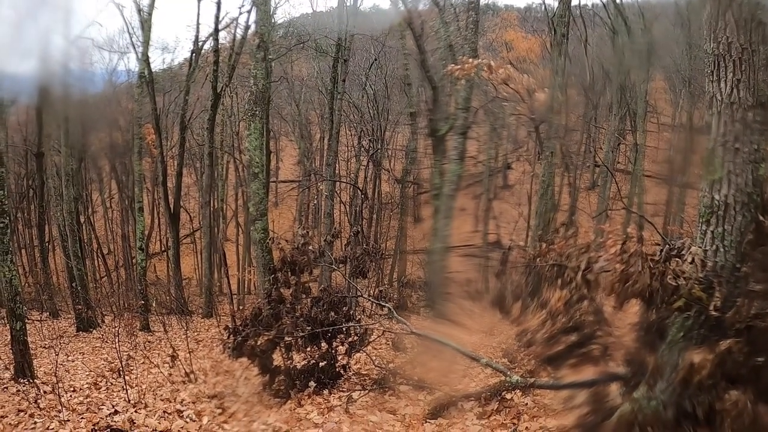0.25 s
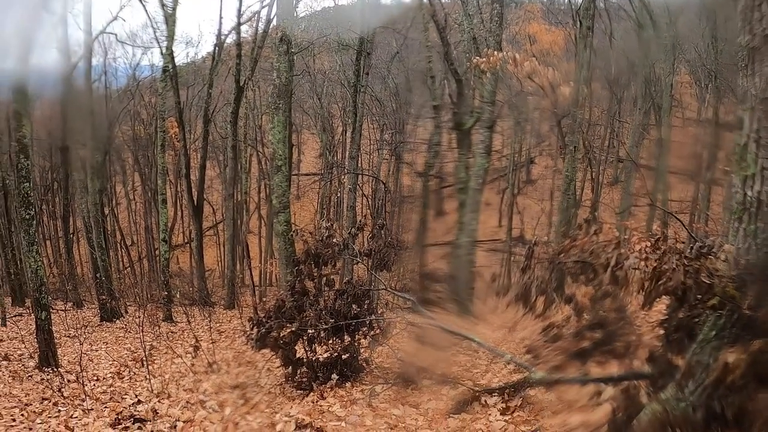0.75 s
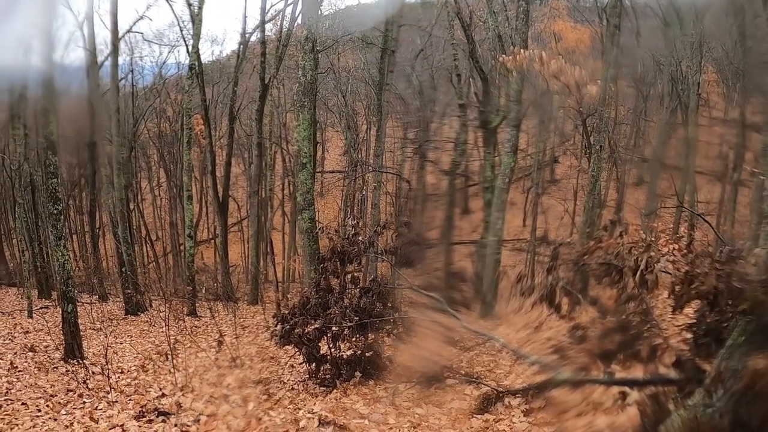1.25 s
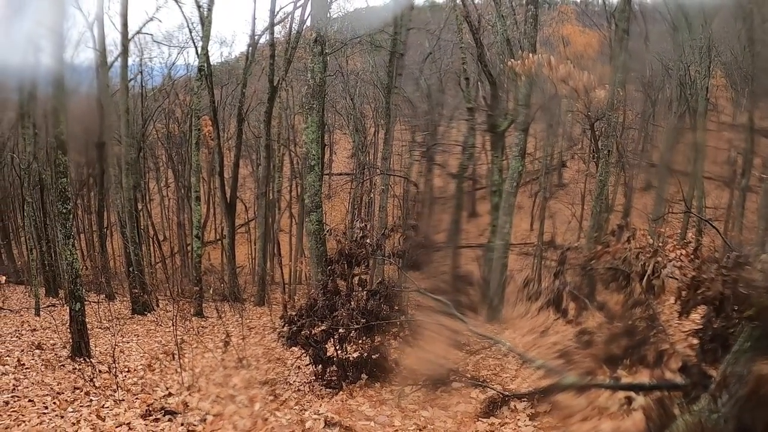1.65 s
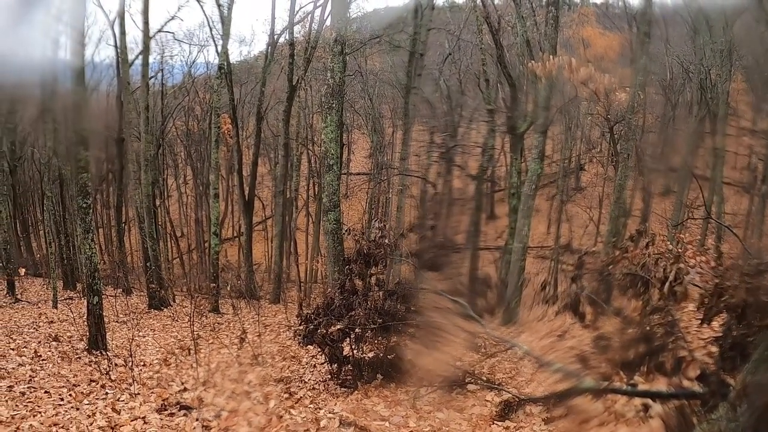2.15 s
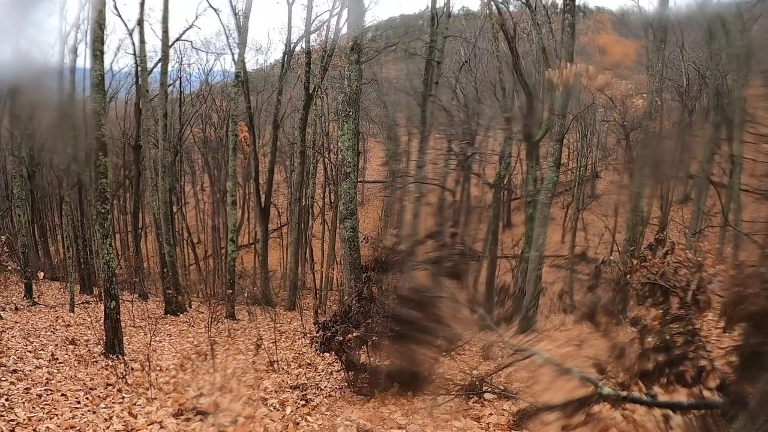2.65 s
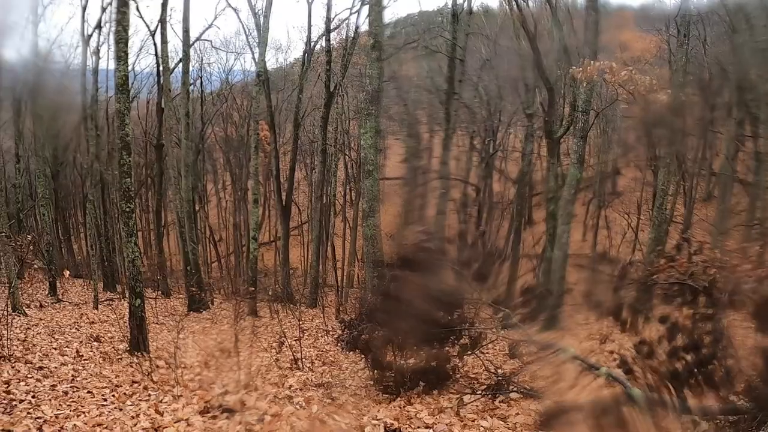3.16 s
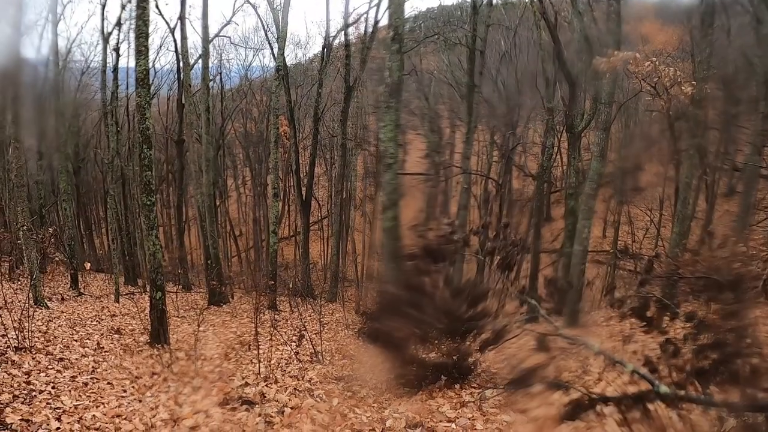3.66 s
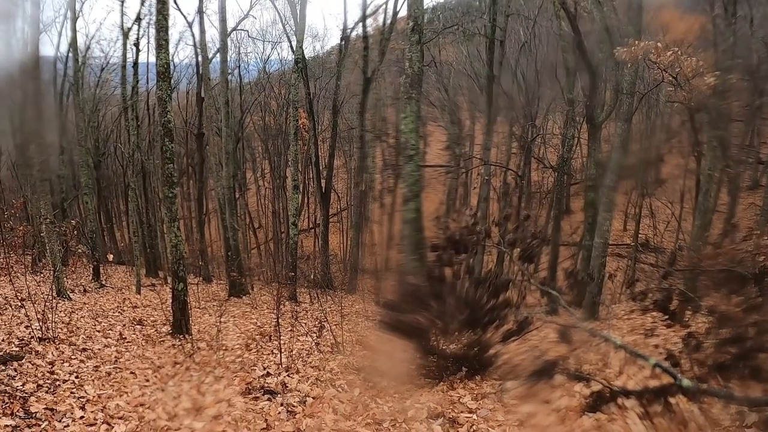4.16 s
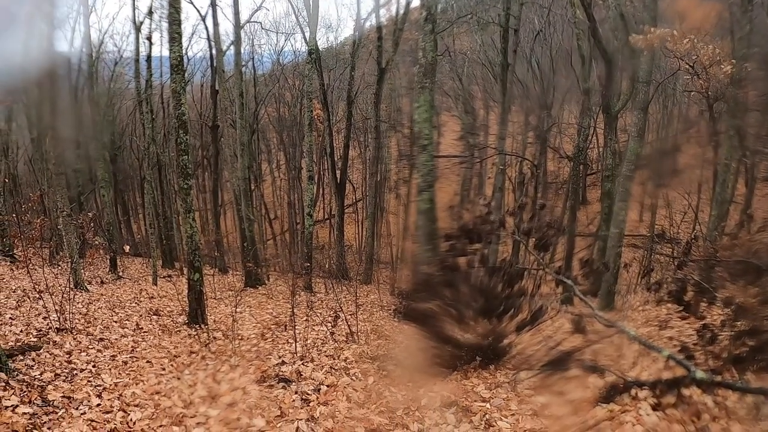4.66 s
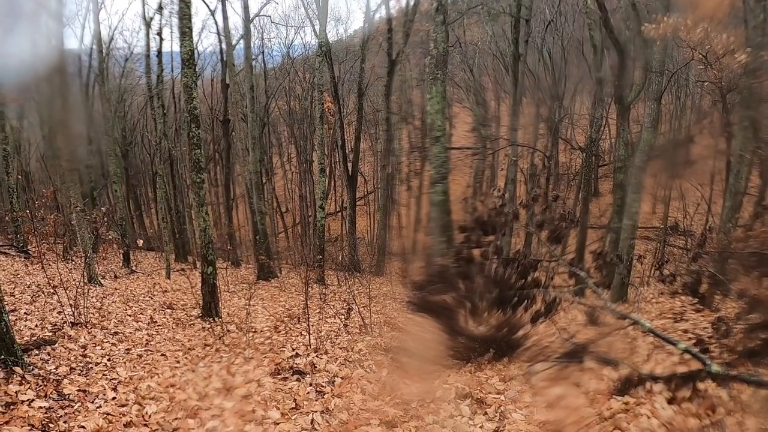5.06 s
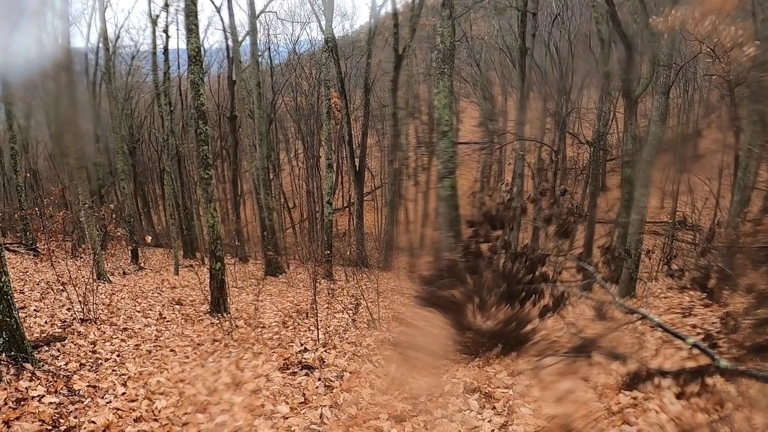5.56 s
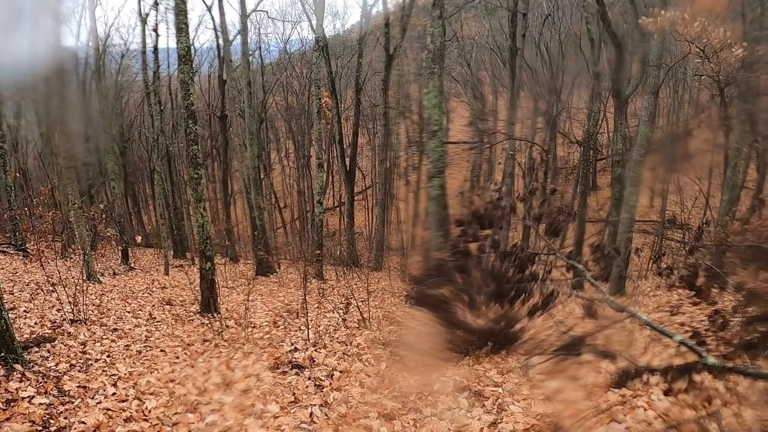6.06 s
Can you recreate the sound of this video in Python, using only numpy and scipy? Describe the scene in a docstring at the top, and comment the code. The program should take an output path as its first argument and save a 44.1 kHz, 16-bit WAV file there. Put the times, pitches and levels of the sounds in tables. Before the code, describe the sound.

Far hounds in a bare, wet wood. A small squeal leads into a long wavering bay, then a pause with leaf ticks and low wind bumps. Squeals break into a second hoarse bay, a thin whine follows, then a third bay with a lower second voice and a final shrill yelp. Each call rings long between the trunks. The stereo microphone stands among dry leaves, with light breeze.

```python
"""Hounds bay far off in a bare, wet wood: three long bays among squeals, whines and yelps, ringing on
between the trunks. Close by, drops tick on dead leaves, some ticks are bright, twigs hiss and gusts thump
on the microphone ports; a drone, a rough yap and a thin whistle are faint. Voices are fluttering partials
plus a throaty rasp, the wood is a noise tail, the near sounds are shaped noise and short bursts."""
import sys
import numpy as np
from scipy import signal
from scipy.fft import rfft, irfft, next_fast_len
from scipy.io import wavfile

SR = 44100
rng = np.random.default_rng(int(sys.argv[2]) if len(sys.argv) > 2 else 0)


def wav_record(signal):
    """Record a signal, one row per channel, as 16-bit PCM in the file named by sys.argv[1]."""
    frames = np.transpose(np.atleast_2d(signal))
    bounded = np.clip(frames, -1, 1)
    # unit amplitude maps onto the largest positive 16-bit level
    quanta = np.round(bounded * 32767).astype(np.int16)
    wavfile.write(sys.argv[1], SR, quanta)


N = 278271

# Far drone spectrum. Each row: frequency in Hz, relative density in dB per Hz.
DRONE_SPECTRUM = [(53, -33), (90, -17), (118, -3), (254, 5), (340, -6.5), (532, -2.5), (674, -8),
                  (715, -24), (873, -29), (1500, -27.5), (1950, -35.5), (3300, -120)]
# Far drone level. Each row: time in seconds, level in dB.
DRONE_LEVEL = [(0, -58), (2.0, -56), (3.2, -54.5), (4.2, -58), (5.5, -59), (6.31, -61)]
# Wind on the ports between gusts. Each row: time in seconds, level in dB.
WIND_LEVEL = [(0, -67), (.8, -65.5), (1.1, -64.5), (1.65, -68.5), (1.85, -49), (2.2, -59), (2.62, -65),
              (2.9, -57), (3.1, -59.5), (3.4, -56.5), (3.6, -71), (4.3, -65.5), (5.2, -70), (6.31, -68)]
# Gust peaks on the ports. Each row: time in seconds, level in dB.
GUST_PEAKS = [(.5, -53), (1.05, -54), (1.79, -49), (2.059, -37.5), (2.354, -40.5), (2.809, -45),
              (3.44, -51), (4.48, -54), (5.661, -59)]
GUST_RISE_DB_PER_S, GUST_FALL_DB_PER_S, WIND_SWING_DB = 402, 263.5, 2
# Twig hiss spectrum. Each row: frequency in Hz, relative density in dB per Hz.
HISS_SPECTRUM = [(700, -21.5), (1000, 3), (1600, 1.5), (2500, -3.5), (4000, -6.5), (6300, -14.5),
                 (8000, -11), (11000, -29.5), (15000, -21)]
# Twig hiss in the breeze. Each row: time in seconds, level in dB.
HISS_LEVEL = [(0, -56.5), (.8, -60), (1.1, -56), (1.25, -52), (1.42, -59), (2.6, -59.5), (3.45, -58),
              (3.74, -53), (4.0, -58), (4.6, -59), (4.79, -54.5), (5.0, -60.5), (5.3, -60.5), (6.05, -61),
              (6.19, -57.5), (6.31, -63)]
# Left-right correlation of the noise beds. Each row: frequency in Hz, correlation (0 to 1).
LIKENESS = [(60, .2), (110, 0.092), (210, 0.8), (390, 0.92), (740, 0.39), (1390, 0.7), (2600, 0.45),
            (5000, 0.43), (10000, 0.13)]
RUSTLE_FROM_DB = -54.5  # hiss level at which the top doubles
PATTER_PER_S, PATTER_DB = 45, -5  # median rate of small drops; level above the twig hiss
# Bright treble of the ticks, some of it on the drops. Each row: time in seconds, peak in dB,
# left above right in dB.
BRIGHT_TICKS = [(0.24, -40, -2), (.872, -40, -2), (.935, -44, 0), (1.08, -35.5, -2), (1.7581, -44.5, 2.5),
                (2.2674, -45.5, -2.5), (2.454, -48, -1.5), (3.4861, -44, 1), (3.55, -39.5, -4),
                (3.609, -38, 0), (3.7835, -48.5, 0), (4.046, -45, 1), (4.181, -43, -.5),
                (4.5392, -47.5, -6), (4.7952, -45, -10), (4.8765, -50, -2), (5.777, -45, 2),
                (5.957, -44.5, 1)]
# Drops on leaves. Each row: time in seconds, peak without crack in dB, pitch in Hz,
# left above right in dB.
LEAF_DROPS = [(0.132, -42, 2850, -6), (0.463, -42, 2660, 5), (0.5865, -43.5, 3770, 2),
              (0.884, -41.5, 2760, -7), (1.078, -40, 3142, -4), (1.1174, -41, 3550, -3),
              (1.47, -50, 7500, -8), (1.529, -46, 3070, 3), (1.631, -43, 1390, 0), (1.809, -44, 1300, 0),
              (2.018, -41, 1150, 4), (1.757, -46, 7000, 0), (1.7774, -40.5, 3377, 0),
              (1.928, -41, 3470, -3), (1.962, -33.5, 2650, 3), (2.346, -38.5, 5300, -1),
              (2.6145, -40, 3000, 0), (2.66, -43.5, 2670, -9), (3.485, -44, 2600, -2),
              (3.521, -39.5, 2890, -5), (3.549, -41, 2750, -2), (3.609, -50, 3540, -3),
              (3.714, -40, 3950, 11), (3.749, -40, 2550, 10), (4.047, -33, 2559, 1.5),
              (4.059, -33.5, 2600, 1.5), (4.18, -43, 2960, 0), (4.2057, -40.5, 3150, 1),
              (4.3355, -43, 2740, 1), (4.41, -36, 2400, 4), (4.4878, -39.5, 2550, 8),
              (4.724, -36.5, 2750, 4), (4.8278, -43, 3085, 14), (4.877, -42, 4660, 2.5),
              (4.971, -47, 3075, -16), (5.388, -40, 4100, -2), (5.881, -46.5, 2550, 0),
              (5.977, -42, 4300, 0), (6.242, -42.5, 4100, -2)]
BRIGHT_TICK_T60_S, DROP_T60_S, DROP_RISE_S = .02, .021, .0013
CRACK_DB, CRACK_SPREAD_DB = -16.5, 5  # above the drop's tick; spread from drop to drop
# Faint thin whistle, perhaps a bird. Each row: time in seconds, pitch in Hz, level in dB.
WHISTLE = [(3.14, 5200, -80), (3.17, 5180, -76), (3.3, 5150, -77), (3.36, 5130, -84)]
# Faint rough yap. Each row: time in seconds, level in dB.
FAR_YAP_LEVEL = [(2.77, -73), (2.8, -59), (2.9, -59.5), (2.94, -64)]
# Its throat. Each row: resonance in Hz, width in Hz, gain in dB.
FAR_YAP_THROAT = [(1666, 240, 1), (2120, 180, -9), (2320, 340, -12)]
FAR_YAP_HZ, FAR_YAP_PAN_DB = 343, 29  # pitch; left above right
FAR_YAP_BREATH = .7  # noise share of source power
# Ringing between the trunks. Each row: frequency in Hz, 60 dB decay in seconds.
WOOD_DECAY = [(500, 2.215), (1100, 2.07), (1800, 2.46), (2900, 0.95), (3500, 0.74)]
WOOD_DB, WOOD_RISE_S = -3.5, .023
WOOD_SIDE_DB, WOOD_SIDE_DB_PER_OCTAVE = -11.5, 5  # side against mid; wider in the treble
NEAR_TREES_DB, NEAR_TREES_S = 9, .1  # the nearest trunks answer louder, and only briefly
# Three long bays, an undertone, a squeal, a whine and a second low voice, one list each. Each row:
# time in seconds, pitch in Hz, level in dB, overtones above level in dB, hoarseness above level in dB.
BAYS = [
    [(.415, 604, -48.5, -23, -4.5), (.45, 557, -27.5, -16.5, -9.5), (.5, 553.7, -28.5, -21, -4.5),
     (.545, 545.7, -30.5, -35.5, -6), (.6, 516.3, -35, -29, -6), (.66, 513.6, -28.5, -26.5, -17),
     (.7, 497.7, -40.5, -11, -27), (.765, 517.8, -27, -23.5, -24.5), (.815, 525, -42.5, -3.5, -29),
     (.865, 531.7, -28.5, -15.5, -29), (.94, 538.2, -48, 2.5, -10.5), (1.0, 547, -31.5, -21, -33),
     (1.035, 548, -33, -18.5, -42), (1.06, 548, -36, -38, -32), (1.12, 549, -43, -33, -37),
     (1.155, 549, -64, -10, -30), (1.21, 549, -51.5, -13, -33)],
    [(3.64, 566.6, -53.5, -10.5, 0), (3.705, 549, -32, -28.5, -6.5), (3.745, 553.7, -29.5, -19, -9.5),
     (3.79, 513, -35.5, -15.5, -3), (3.84, 504, -28, -19.5, -10.5), (3.9, 511.7, -35.5, -5.5, -11.5),
     (3.96, 521, -38, -12, -11.5), (4.02, 544.6, -33, -6.5, -29), (4.06, 585, -26, -23.5, -32),
     (4.11, 594.4, -23, -10.5, -48), (4.14, 570, -28, -15, -16), (4.18, 531.1, -31.5, -17.5, -24),
     (4.25, 553.8, -41, -14, -17.5), (4.33, 532.6, -38.5, -29, -20)],
    [(5.245, 726, -57.5, -14.5, 0.5), (5.27, 646, -23, -26, -16), (5.31, 576.4, -25, -29.5, -12.5),
     (5.4, 524.7, -29.5, -32, -8.5), (5.45, 496, -34, -10.5, -6.5), (5.5, 514.8, -35.5, -12.5, -2.5),
     (5.58, 527, -29, -32, -12), (5.68, 548.7, -30, -26, -12.5), (5.78, 568, -28, -26, -14),
     (5.88, 585, -36.5, -25, -10.5), (5.93, 557, -51, -2, -6.5)],
    [(.49, 468.5, -54, 2, -23), (.52, 451, -46.5, 17.5, -9.5), (.55, 431.3, -55, 12.5, -13.5),
     (.6, 463, -45.5, 5.5, -23), (.67, 493, -45, -0.5, -9), (.7, 499, -47, 4, -4)],
    [(.35, 1244, -56, 3, -8.5), (.372, 1040, -35, -13, -24), (.388, 937, -42.5, 2, -15),
     (.405, 850, -43.5, 1.5, -6.5), (.415, 900, -43, -5.5, 0.5), (.43, 890, -38, 0, -8),
     (.455, 883, -40, -10.5, -4)],
    [(4.63, 1038, -49, -6.5, -28), (4.655, 1106, -40, -19, -21), (4.685, 1125, -36, -19, -23),
     (4.71, 1075, -44.5, -19, -21), (4.76, 1135, -48, -10, -24), (4.83, 1087, -50, -13, -8)],
    [(5.63, 488.5, -29, -22, -19.5), (5.7, 483.6, -37, -24, -17.5), (5.78, 484.6, -31.5, -32, -18.5),
     (5.84, 443.6, -37, -24, -31), (5.97, 504.7, -44.5, -9, 0.5)],
]
# Squeals, whines, yelps, and side tones between the partials of the bays. Each row: start, rise and
# fall in seconds, first and last pitch in Hz, glide time in seconds, level in dB, overtones and
# hoarseness above level in dB.
SHORT_CRIES = [(.275, 0.016, 0.066, 620, 648, 0.026, -51, -31, -27.5),
               (3.362, 0.014, 0.049, 1881, 1800, 0.039, -36.5, -55, -20.5),
               (3.392, 0.0061, 0.016, 1800, 904, 0.033, -45, -39, -15),
               (3.41, 0.0065, 0.057, 1098, 870, 0.018, -42, -30, -0.5),
               (3.419, 0.017, .07, 722, 644, .03, -43.5, -28, -8),
               (3.533, 0.058, 0.0033, 1071, 1051, 0.052, -31, -22.5, -33.5),
               (3.596, 0.011, 0.068, 1260, 878, .018, -27, -17, -19),
               (3.649, 0.049, 0.053, 1040, 831, 0.03, -27.5, -25, -12.5),
               (4.119, 0.016, 0.095, 890, 787, .05, -43, -8, -19),
               (5.208, 0.041, 0.075, 1187, 878, 0.015, -40, -7.5, -2.5),
               (5.761, 0.082, 0.11, 690, 779, 0.057, -36.5, -25, -41),
               (5.9, 0.026, 0.2, 770, 779, 0.053, -50.5, -6, -19),
               (0.554, 0.01, 0.021, 620, 699, 0.019, -28, -24, -14)]
# A last, shriller yelp. Columns as in the bays.
SHRILL_YELP = [(6.04, 920, -56, 0, -7), (6.058, 1127, -42, -2, -7.5), (6.078, 1461, -35.5, -3, -5),
               (6.092, 1509, -37.5, 3, -1.5), (6.115, 1492, -43, 1.5, -0.5), (6.135, 1474, -55, -14, 9),
               (6.2, 1470, -55.5, -16, 11), (6.3, 1484, -55, -16, 0)]
# Throats of the hoarse part. Each row: resonance in Hz, width in Hz, gain in dB.
THROAT = [(442.7, 85, -2.5), (585, 153, 7.5), (826, 310, 0.5), (1350, 455, -8.5), (1756, 240, -12),
          (2225, 410, -24)]
SHRILL_THROAT = [(1150, 540, 1), (1800, 230, -11), (2210, 440, -11), (2780, 660, -21), (3550, 500, -22)]
# Colour of the overtones. Each row: frequency in Hz, gain in dB.
MOUTH_COLOUR = [(900, -18.5), (1050, 4.5), (1200, 0.5), (1400, 1), (1550, 6.5), (1750, 7.5), (1950, -5),
                (2300, 3), (2650, -24.5), (3000, -16), (5000, -47.5)]
# Mouth opening in the bays. Each row: time in seconds, 3rd partial above 2nd in dB, 4th above 3rd in dB.
MOUTH_OPENING = [(.45, -11.5, -25), (.68, -1, -26), (.85, -11, -17), (.9, -16, -14), (.93, -12, -1),
                 (.97, 1, -13), (1.0, -1.5, -12), (1.04, -4, -26), (1.15, 7, -25.5), (3.7, 2, -21),
                 (3.87, -7.5, -23), (3.91, 1.5, -11), (3.96, -8.5, -17), (4.02, -6, -17),
                 (4.1, -19.5, -20.5), (4.17, -10.5, -22), (4.24, 4.5, -14), (4.7, -7, -20.5),
                 (5.3, -8, -18), (5.9, -10, -17)]
SHORT_THIRD_DB, SHRILL_THIRD_DB, FOURTH_DB = -20, -12, -22.5  # 3rd above 2nd partial; 4th above 3rd
SHORT_ONSET_DB, SHORT_FADE_DB = -15, -14.5  # start and end below the peak
SMEAR_DB, SMEAR_HZ = -3.5, 81.5  # smear of the 1st partial: level above hoarseness, noise corner
OVERTONE_SMEAR = .7  # fast unevenness in the overtones of a fully hoarse voice
CLEAR_FLUTTER = .5  # share of flutter left in the 1st partial of a clear voice
SLAP_SHARE, SLAP_SLIP, SLAP_SPREAD = .55, .12, .3  # share of rasp power, slip, spread of force
RASP_LUMPS_DB = 1.6
# Microphone ports. Each row: frequency in Hz, left above right in dB, gain of both in dB.
PORTS = [(30, 0, 3.5), (94.5, -0.5, 1), (400, 0.5, 0), (654, 1.7, -2.5), (1390, 0, -2.5), (3000, 4.5, -0.5),
         (5400, 0, 0), (7930, 3.5, -2), (9570, -1, -12), (12900, -2, -20.5)]
CUTOFF_HZ = 14800


def from_db(db):
    """Decibels to gain."""
    return 10 ** (np.asarray(db) / 20)


def pan_gains(pan_db):
    """Left and right gains for a level difference."""
    return from_db(np.array([[pan_db], [-pan_db]]) / 2)


def band(x, low_hz, high_hz):
    """Butterworth band-pass."""
    return signal.sosfilt(signal.butter(2, [low_hz, high_hz], "band", fs=SR, output="sos"), x)


def rms_one(x):
    """Scale to rms 1."""
    return x / np.sqrt(np.mean(x ** 2) + 1e-20)


def in_time(rows):
    """Columns of a curve table, one value per sample."""
    s, *columns = np.transpose(rows)
    return [np.interp(np.arange(N) / SR, s, column) for column in columns]


def gate(start, end):
    """Opens in 6 ms, closes in 15 ms."""
    return np.interp(np.arange(N) / SR, [start - .006, start, end, end + .015], [0, 1, 1, 0])


def at_hz(points, hz):
    """Read a spectrum on a log-frequency axis."""
    points_hz, values = np.transpose(points)
    return np.interp(np.log(hz), np.log(points_hz), values)


def drift(rate_hz):
    """Slow random wander of rms 1: noise at SR / 20 through a double one-pole low-pass."""
    r = np.exp(-40 * np.pi * rate_hz / SR)
    coarse = rng.standard_normal(N // 20 + 2002)
    slow = signal.lfilter([1], [1, -2 * r, r * r], coarse)[2000:]  # settled part
    return np.interp(np.arange(N) / 20, np.arange(len(slow)), rms_one(slow))


def resonance(x, hz, width_hz):
    """Two-pole resonance, gain 1 on top."""
    r = np.exp(-np.pi * width_hz / SR)
    poles = [1, -2 * r * np.cos(2 * np.pi * hz / SR), r * r]
    return signal.lfilter([(1 - r * r) / 2, 0, (r * r - 1) / 2], poles, x)


def throat(x, modes):
    """Steep resonances side by side, in alternating polarity."""
    out = 0
    for k, (hz, width_hz, db) in enumerate(modes):
        once = resonance(x, hz, width_hz)
        out = out + (-1) ** k * from_db(db) * resonance(once, hz, width_hz)
    return out


def banded_noise(spectrum, patchy_db):
    """Half-octave bands of stereo noise, each with its own level, flicker and left-right likeness."""
    out, together = 0, drift(12)
    edges_hz = 64 * 2 ** np.arange(0, 8.1, .5)
    white = rng.standard_normal((2, 2, N))
    for k, (low_hz, high_hz) in enumerate(zip(edges_hz, edges_hz[1:])):
        hz = np.sqrt(low_hz * high_hz)
        if spectrum[0][0] < hz < spectrum[-1][0]:
            mid, side = band(white[k % 2], low_hz, high_hz)
            alike = np.clip(at_hz(LIKENESS, hz), 0, 1)
            flicker_db = patchy_db * (together + .89 * drift(8.5))
            stereo = np.sqrt(1 + alike) * mid + np.sqrt(1 - alike) * side * [[1], [-1]]
            out = out + from_db(at_hz(spectrum, hz) + flicker_db) * stereo
    return out


def far_drone():
    """Low-pitched noise bands under a slow level curve."""
    return from_db(in_time(DRONE_LEVEL)[0]) * rms_one(banded_noise(DRONE_SPECTRUM, patchy_db=2.0))


def wind_db():
    """Port level: a wavering wind, topped by gusts that rise fast and die slower."""
    t = np.arange(N) / SR
    peaks_db = [db - np.maximum(GUST_RISE_DB_PER_S * (s - t), GUST_FALL_DB_PER_S * (t - s))
                for s, db in GUST_PEAKS]
    wavering_db = in_time(WIND_LEVEL)[0] + WIND_SWING_DB * drift(4.4)
    return np.maximum(wavering_db, np.max(peaks_db, axis=0))


def gusts():
    """Lumpy low pressure on the ports, mostly its own on each side."""
    white = rng.standard_normal((3, N))
    lumps = from_db(3.5 * np.array([drift(22), drift(20)]))
    pressure = (white[:2] + .083 * white[2]) * lumps
    return from_db(wind_db()) * rms_one(band(pressure, 21, 55.2))


def patter():
    """Small drops at random moments, sizes and sides, each a well-damped resonance."""
    born = rng.random(N) < PATTER_PER_S * from_db(4 * drift(3)) / SR
    sizes = born * from_db(5.3 * np.minimum(rng.exponential(1, N), 3)) * rng.choice([-1, 1], N)
    sides = sizes * from_db(rng.normal(0, 1, N) * [[1], [-1]])
    dealt = rng.integers(0, 8, N)  # pitch of each drop
    out = 0
    for k, hz in enumerate(np.geomspace(1500, 10000, 8)):
        rung = resonance(sides * (dealt == k) + 1e-18, hz, .46 * hz)
        out = out + from_db(-7 * np.log2(hz / 2000)) * rung
    return rms_one(out)


def breeze():
    """Twig hiss, brighter as it grows, with the patter following its level."""
    hiss_db, = in_time(HISS_LEVEL)
    hiss = banded_noise(HISS_SPECTRUM, patchy_db=.84)
    hiss = hiss / np.std(band(hiss, 2500, 9000))
    hiss += band(hiss, 9430, 14000) * from_db(np.minimum(hiss_db - RUSTLE_FROM_DB, 12))
    return from_db(hiss_db) * (hiss + from_db(PATTER_DB) * patter())


def bright_ticks():
    """Each bright tick is a short decaying burst of treble noise."""
    out, t = np.zeros((2, N + 2000)), np.arange(2000) / SR
    for s, db, pan_db in BRIGHT_TICKS:
        burst = rng.standard_normal(len(t)) * from_db(-60 * t / BRIGHT_TICK_T60_S)
        tick = band(burst, 7500, 14000)
        at = round(s * SR)
        out[:, at:at + len(t)] += from_db(db) * pan_gains(pan_db) * tick / np.abs(tick).max()
    return out[:, :N]


def leaf_drops():
    """Each drop is a short burst of noise around its own pitch, with a bright crack."""
    out, t = np.zeros((2, N + 2000)), np.arange(2000) / SR
    envelope = from_db(-60 * t / DROP_T60_S) * (1 - np.exp(-t / DROP_RISE_S))
    for s, db, hz, pan_db in LEAF_DROPS:
        burst = rng.standard_normal(len(t)) * envelope
        tick = resonance(burst, hz, .54 * hz)
        crack = band(np.diff(burst, prepend=0), 5800, 13500)
        crack_gain = from_db(CRACK_DB + CRACK_SPREAD_DB * rng.standard_normal())
        drop = tick / np.abs(tick).max() + crack_gain * crack / np.abs(crack).max()
        at = round(s * SR)
        out[:, at:at + len(t)] += from_db(db) * pan_gains(pan_db) * drop
    return out[:, :N]


def whistle():
    """One wavering sine."""
    hz, db = in_time(WHISTLE)
    phase = 2 * np.pi * np.cumsum(hz * (1 + .0068 * drift(40))) / SR
    return gate(WHISTLE[0][0], WHISTLE[-1][0]) * np.sqrt(2) * from_db(db) * np.sin(phase)


def far_yap():
    """Unsteady pulses and breath through throat resonances, from the left."""
    cycles = np.cumsum(FAR_YAP_HZ * (1 + .015 * drift(25))) / SR
    pulses = rms_one(np.diff(np.floor(cycles), prepend=0))
    breath = rng.standard_normal(N)
    source = np.sqrt(1 - FAR_YAP_BREATH) * pulses + np.sqrt(FAR_YAP_BREATH) * breath
    level = gate(FAR_YAP_LEVEL[0][0], FAR_YAP_LEVEL[-1][0]) * from_db(in_time(FAR_YAP_LEVEL)[0])
    return level * rms_one(throat(source, FAR_YAP_THROAT)) * pan_gains(FAR_YAP_PAN_DB)


def wood(x):
    """Scattering off countless trunks: a noise tail that swells fast and dies band by band."""
    t = np.arange(2 * SR) / SR
    edges_hz = 300 * 2 ** np.arange(0, 4.1, .5)
    white = rng.standard_normal((2, len(t)))  # mid, side
    tail = 0
    for low_hz, high_hz in zip(edges_hz, edges_hz[1:]):
        decay_db = -60 * t / at_hz(WOOD_DECAY, np.sqrt(low_hz * high_hz))
        width_db = WOOD_SIDE_DB_PER_OCTAVE * np.log2(low_hz / 500) * np.array([[0], [1]])
        tail = tail + band(white, low_hz, high_hz) * from_db(decay_db + width_db)
    tail *= from_db(1.32 * drift(22)[:len(t)])  # stands of trees and slopes answer in bunches
    tail *= (1 - np.exp(-t / WOOD_RISE_S)) * from_db(NEAR_TREES_DB * np.exp(-t / NEAR_TREES_S))
    tail /= np.sqrt(np.sum(band(tail[0], 400, 800) ** 2) * SR / 800)  # mean power gain about 1 there
    mid, side = signal.fftconvolve(x[None], tail, axes=1)[:, :N]
    return from_db(WOOD_DB) * (mid + from_db(WOOD_SIDE_DB) * side * [[1], [-1]])


def partials(cry, opening):
    """Rows of (s, Hz, 1st to 4th partial dB, hoarseness dB) from a cry's level, colour and mouth opening."""
    s, hz, db, over_db, hoarse_db = np.transpose(cry)
    at_s, *steps_db = np.transpose(opening)
    third_step_db, fourth_step_db = (np.interp(s, at_s, step_db) for step_db in steps_db)
    second_db = db + over_db
    third_db = second_db + third_step_db
    return np.transpose([s, hz, db, second_db, third_db, third_db + fourth_step_db, db + hoarse_db])


def short_cry(start_s, rise_s, fall_s, from_hz, to_hz, glide_s, db, over_db, hoarse_db):
    """A short cry or side tone swells, fades and slides quickly, then slowly, towards its last pitch."""
    t = np.sort(np.append(np.linspace(0, rise_s + fall_s, 12), rise_s))
    hz = to_hz + (from_hz - to_hz) * np.exp(-t / glide_s)
    level_db = db + np.interp(t, [0, rise_s, rise_s + fall_s], [SHORT_ONSET_DB, 0, SHORT_FADE_DB])
    cry = [(start_s + s, f, d, over_db, hoarse_db) for s, f, d in zip(t, hz, level_db)]
    return partials(cry, [(0, SHORT_THIRD_DB, FOURTH_DB)])


def hounds(cries, modes, low_hz, high_hz, jitter, strain, flutter_db, order):
    """Fluttering partials on an unsteady pitch, plus a rasp: a fold slap per `order` cycles, and breath."""
    tone, hoarse = np.zeros(N), np.zeros(N)
    wobble, smear, breath = drift(69.4), drift(SMEAR_HZ), rng.standard_normal(N)
    slip = SLAP_SLIP * drift(45)  # in slap periods
    force = 1 + SLAP_SPREAD * rng.standard_normal(N)
    # partials drop out, upper ones more
    flutter = [flutter_db * depth * np.minimum(drift(30), .8) for depth in (1.8, 2.0, 2.6, 2.8)]
    for cry in cries:
        hz, *partials_db, hoarse_db = in_time(cry)
        rough = np.clip(from_db(hoarse_db - partials_db[0]), 0, 1)
        # a hoarse voice also holds its pitch badly
        phase = 2 * np.pi * np.cumsum(hz * (1 + (jitter + strain * rough) * wobble)) / SR
        on = gate(cry[0][0], cry[-1][0])
        first_flutter = CLEAR_FLUTTER + (1 - CLEAR_FLUTTER) * np.sqrt(rough)
        level_db = partials_db[0] + first_flutter * flutter[0]
        tone += on * np.sqrt(2) * from_db(level_db) * np.sin(phase)
        uneven = 1 + OVERTONE_SMEAR * np.sqrt(rough) * smear
        for k in range(1, 4):
            level_db = partials_db[k] + flutter[k] + at_hz(MOUTH_COLOUR, (k + 1) * hz)
            tone += on * np.sqrt(2) * from_db(level_db) * uneven * np.sin((k + 1) * phase)
        # uneven cycles smear the 1st partial
        tone += on * from_db(hoarse_db + SMEAR_DB) * smear * np.cos(phase)
        slaps = np.diff(np.floor(phase / (2 * np.pi * order) + slip), prepend=0) > 0
        slap_gain = np.sqrt(SLAP_SHARE * order * SR / hz)  # rarer slaps are stronger
        rasp = slap_gain * slaps * force + np.sqrt(1 - SLAP_SHARE) * breath
        hoarse += on * from_db(hoarse_db) * rasp
    # rasp level is referred to the band low_hz to high_hz
    scale = np.std(band(throat(breath, modes), low_hz, high_hz))
    lumpy = hoarse * from_db(RASP_LUMPS_DB * drift(23))  # throaty lumps
    voices = tone + throat(lumpy, modes) / scale
    # a muzzle radiates no bass
    return signal.sosfilt(signal.butter(6, 385, "high", fs=SR, output="sos"), voices)


def scene():
    """Far hounds in the ringing wood, near leaves and air."""
    cries = [partials(bay, MOUTH_OPENING) for bay in BAYS] + [short_cry(*row) for row in SHORT_CRIES]
    shrill = partials(SHRILL_YELP, [(0, SHRILL_THIRD_DB, FOURTH_DB)])
    voices = hounds(cries, THROAT, 680, 920, jitter=.004, strain=.025, flutter_db=2.2, order=3)
    voices += hounds([shrill], SHRILL_THROAT, 900, 3200, jitter=.008, strain=.025, flutter_db=2.5, order=2)
    far = far_drone() + whistle() + far_yap()
    near = gusts() + breeze() + bright_ticks() + leaf_drops()
    return far + near + wood(voices) + voices


def record(dry):
    """The two ports differ in colour and lose treble, the left hears a sample late; the top is cut."""
    size = next_fast_len(N + 4096)
    log_hz = np.log(np.maximum(np.arange(size // 2 + 1) * SR / size, 1))
    at, pan_db, gain_db = np.transpose(PORTS)
    side_db = np.interp(log_hz, np.log(at), pan_db) / 2 * np.array([[1], [-1]])
    ports = from_db(side_db + np.interp(log_hz, np.log(at), gain_db))
    out = irfft(rfft(dry, size) * ports, size)[:, :N]
    out[0, 1:] = out[0, :-1].copy()
    return signal.sosfilt(signal.cheby2(12, 70, CUTOFF_HZ, fs=SR, output="sos"), out)


dry = scene()
out = record(dry)
wav_record(out)
```